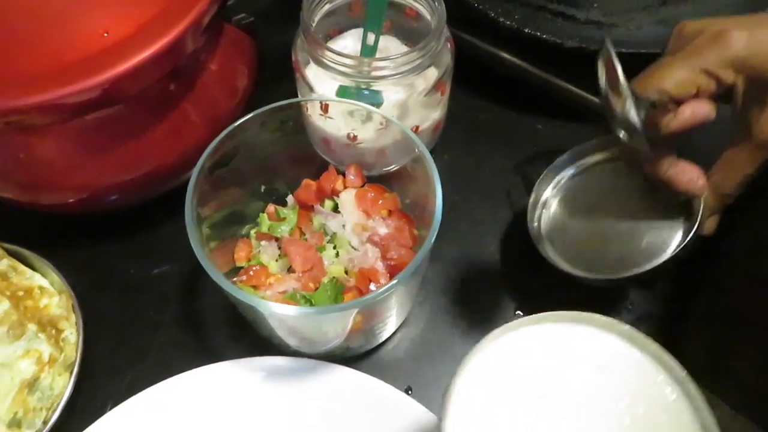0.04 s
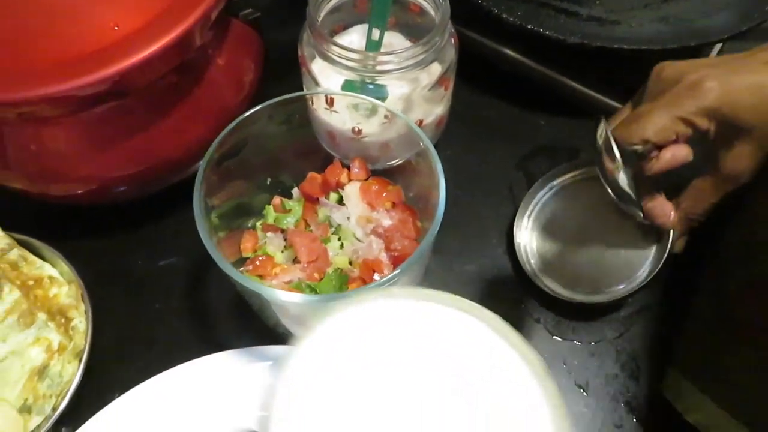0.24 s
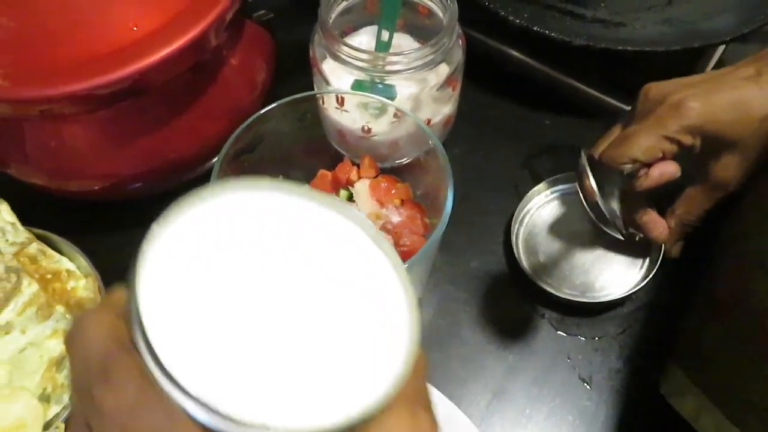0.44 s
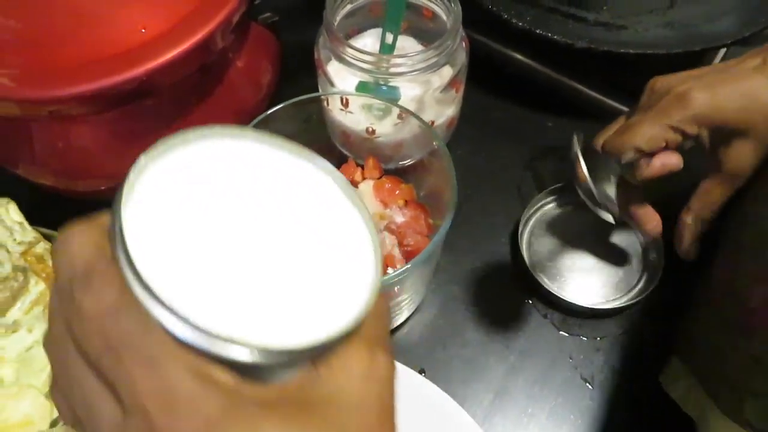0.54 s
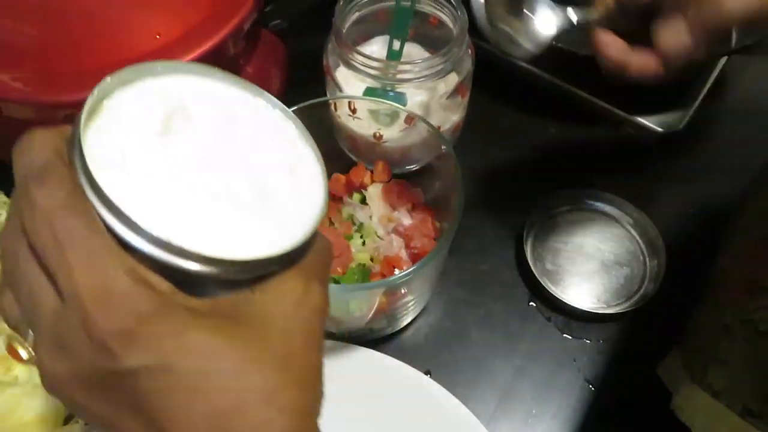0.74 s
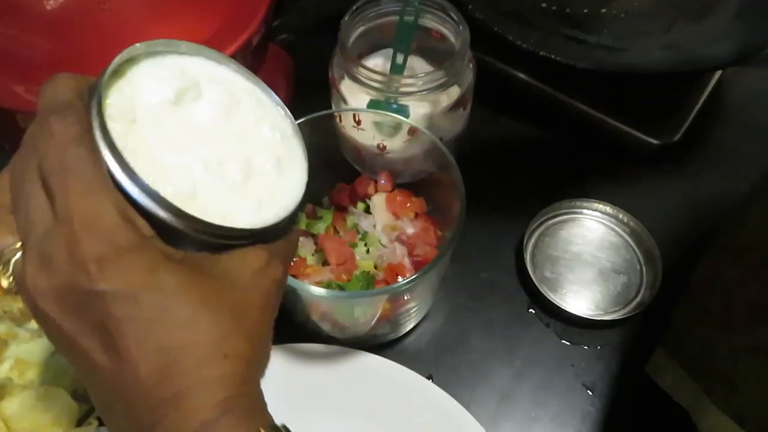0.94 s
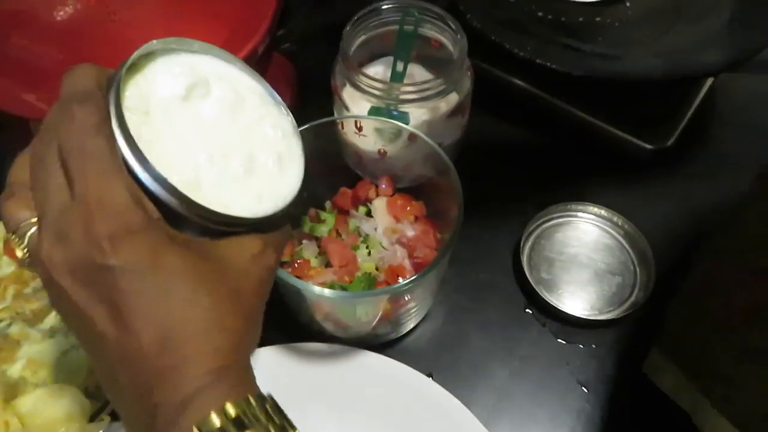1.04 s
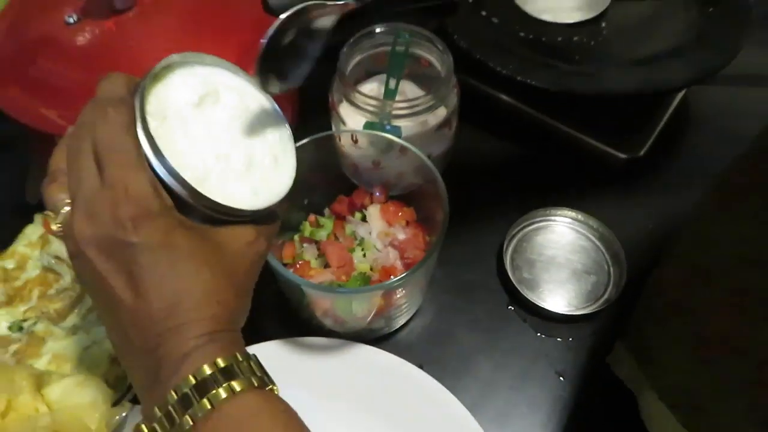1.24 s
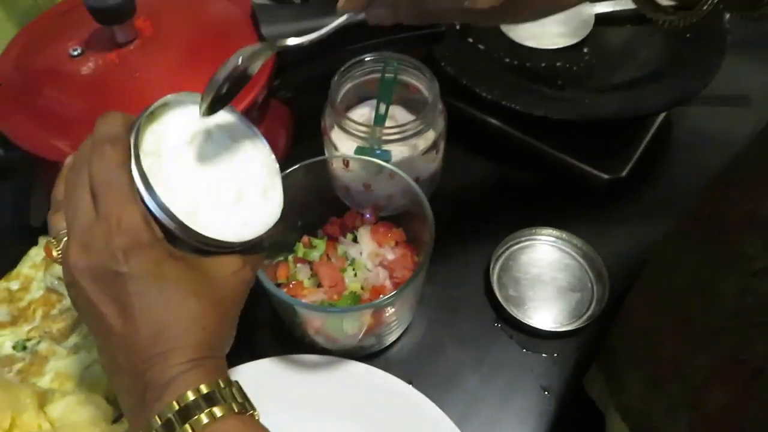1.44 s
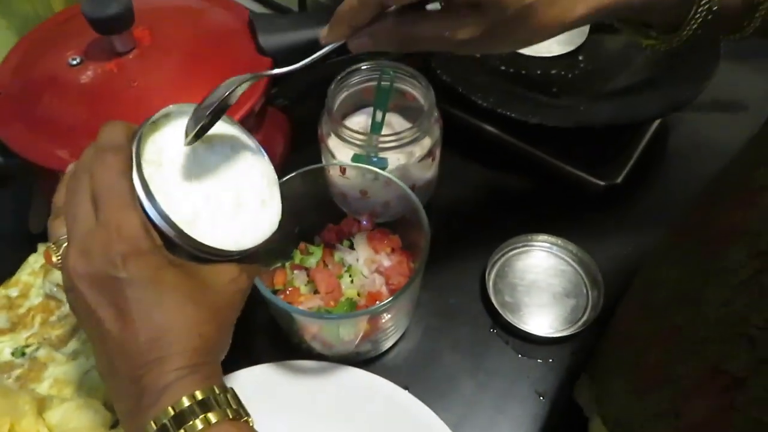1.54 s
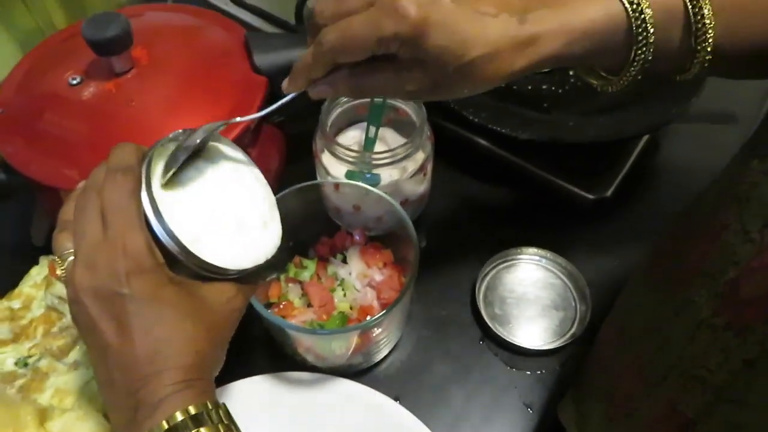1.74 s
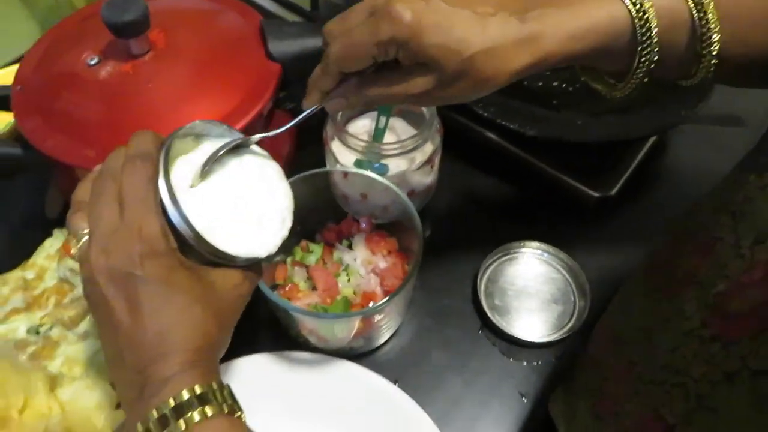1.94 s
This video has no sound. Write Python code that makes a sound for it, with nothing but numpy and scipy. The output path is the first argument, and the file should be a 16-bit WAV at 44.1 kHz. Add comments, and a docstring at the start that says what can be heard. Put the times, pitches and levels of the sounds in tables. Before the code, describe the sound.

Metal lid set down on a hard counter in two bright clinks, followed by a soft spoon knock

```python
"""In a small, hard kitchen a steel lid is put down on the counter close to the microphone.
Its rim strikes while it is still held; then it is let go, drops flat and rocks to rest: each contact sets
off fading sines for all that rings, and short coloured noise for the clack and the counter's thud.
A spoon knocks (fading sines and noise) and faint taps follow (noise with one broad resonance).
A motor hums in wavering sines over rumble and hiss made of noise; the loudest peaks are clipped."""
import sys
import numpy as np
from scipy import signal
from scipy.fft import rfft, irfft
from scipy.io import wavfile
from scipy.ndimage import uniform_filter1d

SR = 44100
rng = np.random.default_rng(int(sys.argv[2]) if len(sys.argv) > 2 else 0)


def file_out(sig):
    """Save sig as 16-bit WAV at sys.argv[1]."""
    # one column per channel
    cols = np.atleast_2d(sig).T
    # limit, then scale
    lim = np.clip(cols, -1, 1)
    pcm = np.round(lim * 32767).astype(np.int16)
    wavfile.write(sys.argv[1], SR, pcm)


N = 88200  # samples: two seconds

# Notes set ringing by the lid's contacts: the steel lid, the short body of its clack,
# and a pan or tin ringing along near 1160 Hz. Each entry: frequency in Hz.
RINGING_HZ = [905, 945, 1160, 1470, 1521, 2130, 2279, 2719, 3418, 3858, 3896, 4912, 5147, 5274, 5445, 6627,
              6960, 8535, 8574, 9190, 10640, 10792, 11171, 11737, 12454, 12900, 13514, 14570]
# Colour of the counter's thud. Each row: frequency in Hz, relative level in dB.
COUNTER_COLOUR = [(70, -33.5), (170, -7), (350, -6), (560, -3.5), (750, -4), (900, 3), (1200, 0),
                  (1900, -1), (4000, -15), (12000, -45)]
THUD_T60_S = 0.035  # time for the thud to fall by 60 dB
CHATTER_PER_S = 2000  # average number of chatter ticks per second
RING_ROOM_DB, CLACK_ROOM_DB = -16.5, -13.5  # strength of the room's reflections


def lid(hits, modes, clack_colour, clack_t60, chatter, damping):
    """Every contact sets the notes ringing, clacks the sheet steel and thuds in the counter."""
    times, ring_db, clack_db, thud_db = np.array(hits).T
    start, hold, release, chatter_ring_db, chatter_clack_db = chatter
    note = contact_ring(modes)
    ticks = chatter_ticks(start, hold, release)

    blows = np.bincount((times * SR).astype(int), undb(ring_db), N)
    # Subtracting most of the previous sample thins the bass of the ticks that set off the ring.
    light_ticks = signal.lfilter([1, -0.98], 1, ticks)
    ring = signal.fftconvolve(blows + undb(chatter_ring_db) * light_ticks, note)[:N] * damping

    clacks = contacts(times, clack_db, clack_t60, clack_colour)
    # The square root makes up for how sparse the ticks are.
    chatter_clacks = colour(ticks, clack_colour) * undb(chatter_clack_db) * np.sqrt(SR / CHATTER_PER_S)
    thuds = contacts(times, thud_db, THUD_T60_S, COUNTER_COLOUR)
    return room(ring, RING_ROOM_DB) + room(clacks + chatter_clacks + thuds, CLACK_ROOM_DB)


def contact_ring(modes, sway_db=4.5, sway_s=0.025):
    """All that one blow sets ringing: fading sines whose levels sway at random."""
    t = np.arange(N // 2) / SR
    sways = rng.standard_normal((len(RINGING_HZ), 64))
    knots = sway_s * np.arange(sways.shape[1])
    note = np.zeros(len(t))
    for hz, (t60, db), sway in zip(RINGING_HZ, modes, sways):
        # As the lid tilts the levels sway; the first knot has none, so each note starts at its own level.
        level = np.interp(t, knots, undb(db + sway_db * sway * (knots > 0)))
        note += level * undb(-60 * t / t60) * np.sin(2 * np.pi * hz * t)
    return note


def chatter_ticks(start, hold, release):
    """The rim chatters on the counter: random ticks at a steady level, then fading."""
    ticks = (rng.random(N) < CHATTER_PER_S / SR) * rng.standard_normal(N)
    return ticks * at(np.concatenate([np.ones(int(hold * SR)), fade(release)]), start)


# The rim meets the counter. Each row: start in seconds, then ring, clack and thud levels in dB.
RIM_HITS = [(.2088, -29.5, -28.5, -34.5), (.2131, 1, -2, -20.5), (.2152, -20, -7, -24)]
# How each note rings for the held lid. Each row: time to fall by 60 dB in seconds, level in dB.
RIM_RING = [(0.044, -13.5), (0.55, -34), (0.17, -57), (0.22, -28.5), (0.18, -24), (0.02, -5), (.37, -28),
            (0.16, -9.5), (1.1, -44), (0.31, -34), (.35, -30.5), (0.69, -35), (.18, -13), (.3, -43),
            (0.25, -40.5), (0.8, -40), (0.37, -27.5), (0.38, -36.5), (0.13, -17.5), (0.51, -48),
            (0.48, -43), (.22, -30.5), (.25, -52.5), (0.16, -27), (.22, -38), (.18, -40.5), (.19, -33),
            (.2, -41.5)]
# Colour of the rim's clack. Each row: frequency in Hz, relative level in dB.
RIM_CLACK = [(70, -21), (125, -8), (200, -18), (330, -2), (480, -18.5), (700, -16.5), (900, 8),
             (1130, -28.5), (1750, -10.5), (2200, 6), (2750, -5.5), (3300, -9.5), (4600, -12), (5200, 8.5),
             (6000, -20), (7000, -11.5), (8600, -12), (9900, -33), (11000, -24), (13500, -27.5),
             (16000, -41.5)]
# Chatter of the rim. One row: start in seconds, hold in seconds,
# time to fall by 60 dB afterwards in seconds, ring level in dB, clack level in dB.
RIM_CHATTER = (.275, .035, .07, -41, -50)


def rim_strike():
    """The held lid strikes the counter with its rim; the ring is a little reduced throughout."""
    return lid(RIM_HITS, RIM_RING, RIM_CLACK, clack_t60=0.019, chatter=RIM_CHATTER, damping=0.88)


# The lid drops and rocks. Each row: start in seconds, then ring, clack and thud levels in dB.
DROP_HITS = [(.5160, -32.5, -24, -45.5), (.5195, -0.5, -6, -34), (.5250, -15.5, -12.5, -32.5),
             (.5470, -15.5, -27, -31), (.5670, -25.5, -23.5, -23), (.5732, -16.5, -9, -19),
             (.5810, -19, -20, -23), (.5995, -16, -19, -28.5), (.6240, -17, -32.5, -30.5)]
# How each note rings after the drop. Each row: time to fall by 60 dB in seconds, level in dB.
DROP_RING = [(.03, -38), (0.44, -37), (.9, -52), (.35, -33), (.25, -45), (.022, -30.5), (.35, -37),
             (0.15, -15), (.3, -30), (0.38, -29.5), (.35, -35.5), (0.34, -31), (0.19, -11.5), (.27, -32.5),
             (.9, -32.5), (0.36, -43), (0.54, -24), (.4, -46), (0.32, -29.5), (.28, -45), (.22, -54),
             (0.22, -27), (.2, -33), (.22, -31), (.17, -34), (0.32, -34.5), (.2, -27), (.15, -43)]
# Colour of the flat lid's clack. Each row: frequency in Hz, relative level in dB.
DROP_CLACK = [(300, -28.5), (1500, -27), (2400, -0.5), (3300, -11), (4050, 3), (4600, -16.5), (5300, 10.5),
              (6100, -19), (7000, -1.5), (7800, -29.5), (9000, -10.5), (9900, -42.5), (10900, -23),
              (13500, -22.5), (15600, -30), (16400, -43.5)]
# Chatter after the drop. One row: start in seconds, hold in seconds,
# time to fall by 60 dB afterwards in seconds, ring level in dB, clack level in dB.
DROP_CHATTER = (.526, .06, .18, -35, -31)
SETTLE_S, SETTLE_TAKES_S, SETTLE_DB = 0.625, 0.035, -10  # when, how long, change in ring level


def drop():
    """The lid drops flat and rocks; once it lies flat, the counter damps the ring."""
    settled = np.clip((np.arange(N) / SR - SETTLE_S) / SETTLE_TAKES_S, 0, 1)
    return lid(DROP_HITS, DROP_RING, DROP_CLACK, clack_t60=0.028, chatter=DROP_CHATTER,
               damping=undb(SETTLE_DB * settled))


# Spoon contacts. Each row: start in seconds, knock level in dB, steel click level in dB.
SPOON_HITS = [(1.2232, -18, -30.5), (1.2282, -40.5, -28.5), (1.2316, -30.5, -29), (1.2400, -29.5, -42)]
# The knock's notes. Each row: frequency in Hz, time to fall by 60 dB in seconds, level in dB.
KNOCK_MODES = [(178.1, 0.099, -22.5), (746, .04, -24), (1033, 0.053, -5), (1269, .055, -8),
               (1420, 0.026, -7.5), (1585, 0.037, -10), (1867, 0.0284, -15), (4320, 0.073, -23)]
# Colour of the knock's noise. Each row: frequency in Hz, relative level in dB.
KNOCK_COLOUR = [(70, -26.5), (180, -3.5), (280, -9.5), (420, -8), (720, -6), (830, 0), (1030, -5),
                (1400, -5.5), (2000, -12.5), (2400, -25), (5000, -26), (14000, -56)]
# Colour of the steel click. Each row: frequency in Hz, relative level in dB.
CLICK_COLOUR = [(500, -13.5), (1800, -2), (2800, 0), (3500, -2), (4350, 6), (5300, -9), (6400, 1),
                (7600, -12.5), (8700, -12.5), (10000, -20), (12800, -24), (14500, -43)]
KNOCK_T60_S, CLICK_T60_S = 0.044, 0.032  # times for the noises to fall by 60 dB
KNOCK_NOISE_DB = -4.5  # added to each knock level for its noise
SPOON_ROOM_DB = -12  # strength of the room's reflections, for the taps too


def spoon():
    """A hand-damped spoon: hollow knocks with a small steel click."""
    times, knock_db, click_db = np.array(SPOON_HITS).T
    t = np.arange(N) / SR
    note = sum(undb(db) * fade(t60) * np.sin(2 * np.pi * hz * t) for hz, t60, db in KNOCK_MODES)
    knocks = sum(undb(db) * at(note, s) for s, db in zip(times, knock_db))
    knock_noise = contacts(times, knock_db + KNOCK_NOISE_DB, KNOCK_T60_S, KNOCK_COLOUR)
    clicks = contacts(times, click_db, CLICK_T60_S, CLICK_COLOUR)
    return room(knocks + knock_noise + clicks, SPOON_ROOM_DB)


# Faint taps while tin and spoon are handled. Each row: start in seconds, resonance in Hz, level in dB.
TAPS = [(1.070, 2410, -49), (1.609, 560, -46.5), (1.756, 7820, -60), (1.781, 1508, -41.5)]
TAP_T60_S, TAP_SKIRT_DB = 0.032, -26  # fading time; level an octave from the resonance


def taps():
    """Light touches, each a short noise with one broad resonance."""
    touches = np.zeros(N)
    for s, hz, db in TAPS:
        resonance = [(hz / 2, TAP_SKIRT_DB), (hz, 0), (hz * 2, TAP_SKIRT_DB), (hz * 10, TAP_SKIRT_DB * 2)]
        touches += contacts([s], [db], TAP_T60_S, resonance)
    return room(touches, SPOON_ROOM_DB)


# Background over time. Each row: time in seconds, then hum, rumble and hiss levels in dB.
BACKGROUND = [(0, -39.5, -41, -45.5), (0.202, -43, -40.5, -41.5), (.26, -53, -51, -59),
              (.5, -49, -50.5, -53), (.75, -58, -58, -58), (1.1, -53.5, -53.5, -60.5),
              (1.4, -50, -51, -57.5), (1.65, -50, -47.5, -57), (1.85, -48, -44.5, -55),
              (2, -48.5, -44, -50.5)]
# The motor's notes. Each row: frequency in Hz, relative level in dB, around which it wavers.
HUM = [(96, -9.5), (146, -3), (192, -13), (289, -6.5), (386, -8), (1780, -22.5), (2360, -26.5)]
# Colour of the rumble. Each row: frequency in Hz, relative level in dB.
RUMBLE_COLOUR = [(25, -4), (38, -1), (65, -3), (95, 1.5), (150, 3), (230, -4), (330, -4.5), (430, -5),
                 (560, -17), (900, -38.5), (3000, -56)]
# Colour of the hiss. Each row: frequency in Hz, relative level in dB.
HISS_COLOUR = [(200, -20), (550, 2), (1050, 4.5), (1500, -0.5), (2400, -0.5), (3500, -9.5), (5500, -14.5),
               (8000, -21.5), (10000, -25.5), (14000, -31), (16000, -40.5)]


def kitchen(waver_db=0.5, wander_rad=0.6, waver_per_s=14, flicker_db=-1.63):
    """A wavering motor hum over rumble and flickering hiss; all follow the levels over time."""
    t = np.arange(N) / SR
    times, *levels = np.array(BACKGROUND).T
    hum_gain, rumble_gain, hiss_gain = (undb(np.interp(t, times, db)) for db in levels)
    hum = np.zeros(N)
    for hz, db in HUM:
        level = np.sqrt(2) * undb(db + waver_db * walk(waver_per_s))
        hum += level * np.sin(2 * np.pi * hz * t + wander_rad * walk(waver_per_s))
    rumble = colour(rng.standard_normal(N), RUMBLE_COLOUR)
    hiss = colour(rng.standard_normal(N), HISS_COLOUR) * undb(flicker_db * walk(waver_per_s))
    return hum_gain * hum + rumble_gain * rumble + hiss_gain * hiss


ROOM_T60_S, ROOM_TREBLE_T60_S, ROOM_LAG_S = 0.42, 0.23, 0.007  # fading times, delay of reflections


def room(x, wet_db, split_hz=7000):
    """Add the kitchen's reflections as a fading noise tail; the treble dies sooner."""
    noise = rng.standard_normal(N)
    low = signal.sosfiltfilt(signal.butter(2, split_hz, fs=SR, output="sos"), noise)
    tail = at(low * fade(ROOM_T60_S) + (noise - low) * fade(ROOM_TREBLE_T60_S), ROOM_LAG_S)
    return x + undb(wet_db) * signal.fftconvolve(x, tail / np.linalg.norm(tail))[:N]


# How much the two channels differ. Each row: frequency in Hz, side level against the middle in dB.
WIDTH = [(60, -27), (400, -14.5), (1300, -15), (2700, -15), (4600, -5.5), (8000, -7.5), (14000, 2.5)]
DIFFUSE_DB, LEAN_DB = -30, 0.4  # near reflections in the side; how much louder the second channel is


def ports(x, size=96, shadow=0.32):
    """Two microphone ports: alike in the bass, less so in the treble, with differing near reflections."""
    hz = np.arange(N + 1) * SR / (2 * N)
    knots = np.linspace(0, SR / 2, size)
    turn = np.interp(hz, knots, rng.choice([-1, 1], size))  # phase difference
    tilt = np.interp(hz, knots, rng.standard_normal(size))  # level difference
    near = rng.standard_normal(N) * fade(ROOM_TREBLE_T60_S)
    reflections = undb(DIFFUSE_DB) * rfft(near / np.linalg.norm(near), 2 * N)
    apart = (1j * unit(turn) + shadow * tilt) * gains(WIDTH, hz) + reflections
    side = irfft(rfft(x, 2 * N) * apart)[:N]
    return np.array([(x + side) * undb(-LEAN_DB / 2), (x - side) * undb(LEAN_DB / 2)])


def contacts(times, levels_db, t60, points):
    """Each contact sets off a dense cluster of heavily damped vibrations, made of fading noise."""
    bursts = sum(undb(db) * at(even_noise() * fade(t60), s) for s, db in zip(times, levels_db))
    return colour(bursts, points)


def even_noise(size=256):
    """Noise whose short pieces all hold every frequency equally."""
    phases = 2j * np.pi * rng.random((N // size + 1, size // 2 + 1))
    return unit(irfft(np.exp(phases), axis=1).ravel()[:N])


def colour(x, points):
    """Causal filter with the given spectrum that keeps the power of white noise."""
    # Folding the cepstrum forward makes the filter respond as early as it can (minimum phase).
    cepstrum = irfft(np.log(unit(gains(points, np.arange(N + 1) * SR / (2 * N)))))
    cepstrum[1:N] *= 2
    cepstrum[N + 1:] = 0
    return irfft(rfft(x, 2 * N) * np.exp(rfft(cepstrum)))[:N]


def gains(points, hz):
    """Gain at each frequency, drawn between (Hz, dB) points."""
    f, db = np.array(points).T
    return undb(np.interp(np.log(np.maximum(hz, 1)), np.log(f), db))


def walk(rate):
    """Slow random drift, smoothed from `rate` random steps per second and scaled to rms 1."""
    k = int(SR / rate)
    steps = np.repeat(rng.standard_normal(N // k + 1), k)
    return unit(uniform_filter1d(uniform_filter1d(steps, k), k)[:N])


def fade(t60):
    """Exponential decay from 1 that falls by 60 dB in t60 seconds."""
    return np.exp(-np.log(1000) * np.arange(N) / SR / t60)


def at(x, s):
    """Delay a sound to start at s seconds."""
    return np.concatenate([np.zeros(int(s * SR)), x])[:N]


def undb(db):
    """Turn decibels into a plain factor."""
    return 10 ** (np.asarray(db) / 20)


def unit(x):
    """Scale to rms 1."""
    return x / np.sqrt(np.mean(x ** 2))


def scene():
    """The lid's two landings, the spoon, the taps and the room's hum, heard at two ports."""
    return ports(rim_strike() + drop() + spoon() + taps() + kitchen())


CEILING, TOP_HZ = 0.95, 16000  # clipping level (full scale is 1); upper limit of the sound


def record(dry):
    """Overload clips the loudest peaks; then a steep filter cuts the top."""
    clipped = np.clip(dry, -CEILING, CEILING)
    return signal.sosfilt(signal.ellip(8, 0.2, 80, TOP_HZ, fs=SR, output="sos"), clipped)


dry = scene()
out = record(dry)
file_out(out)
```